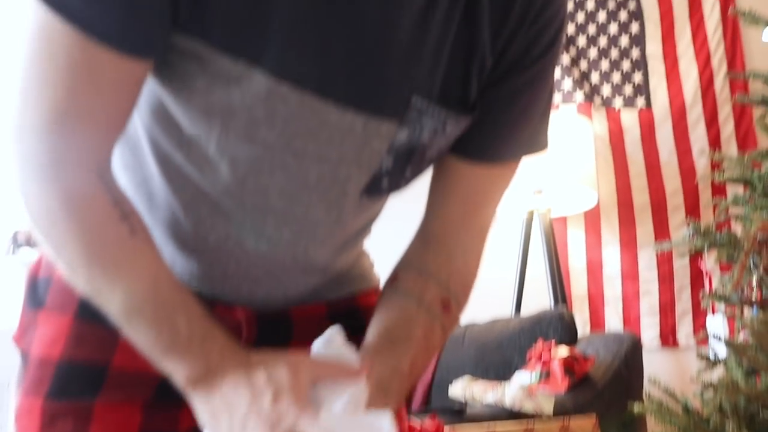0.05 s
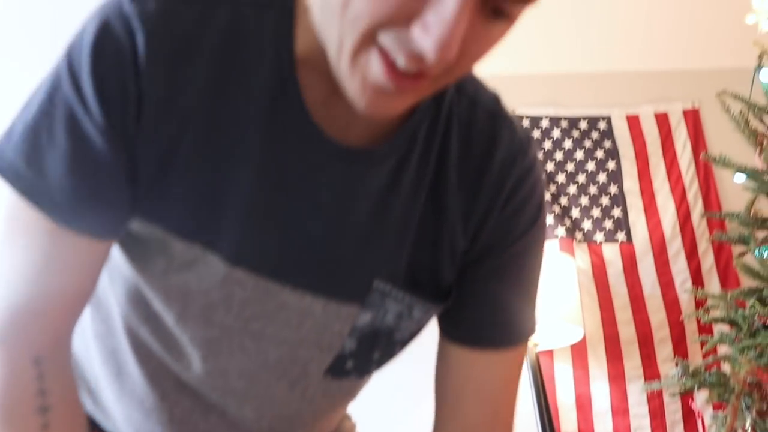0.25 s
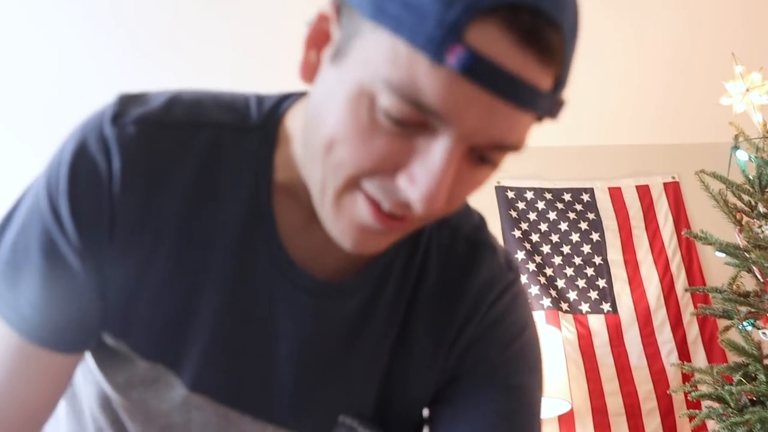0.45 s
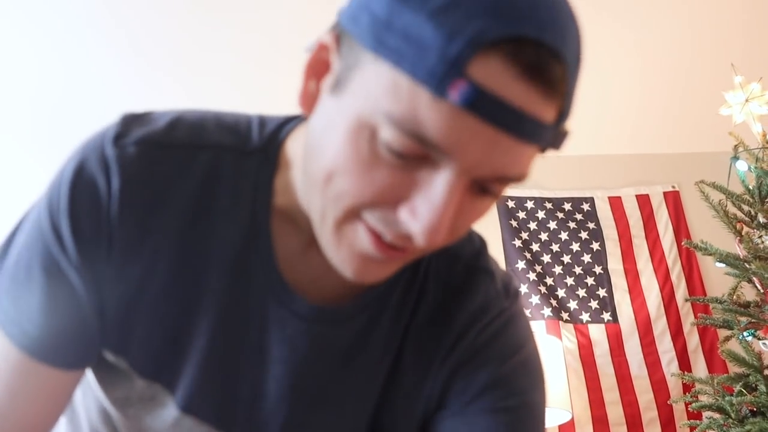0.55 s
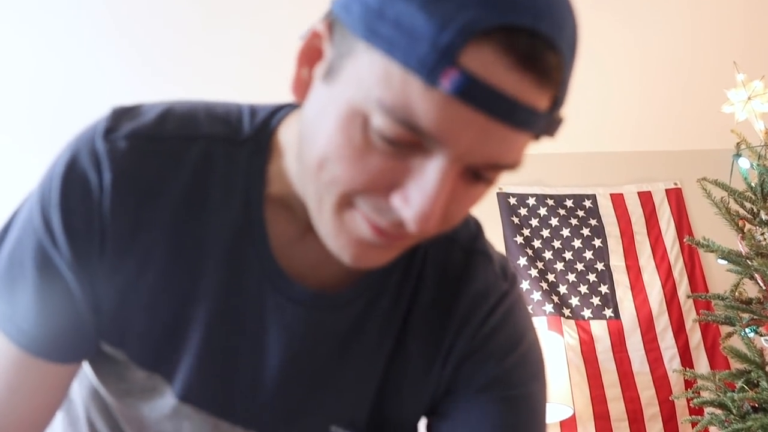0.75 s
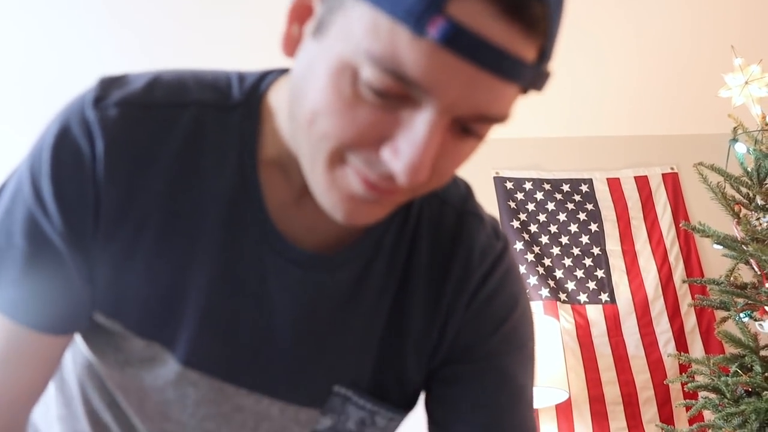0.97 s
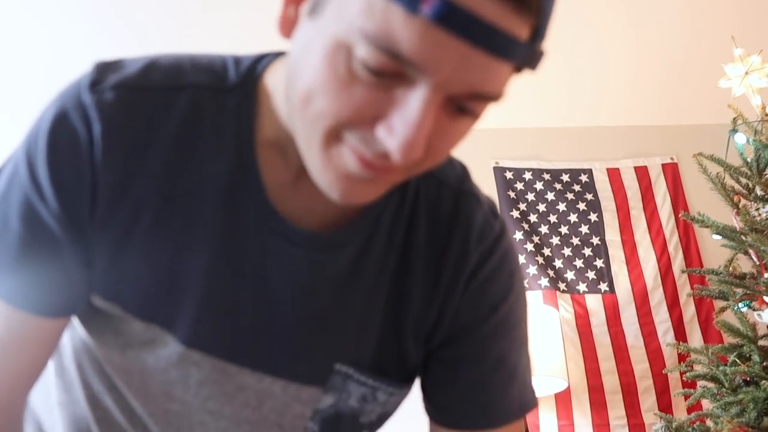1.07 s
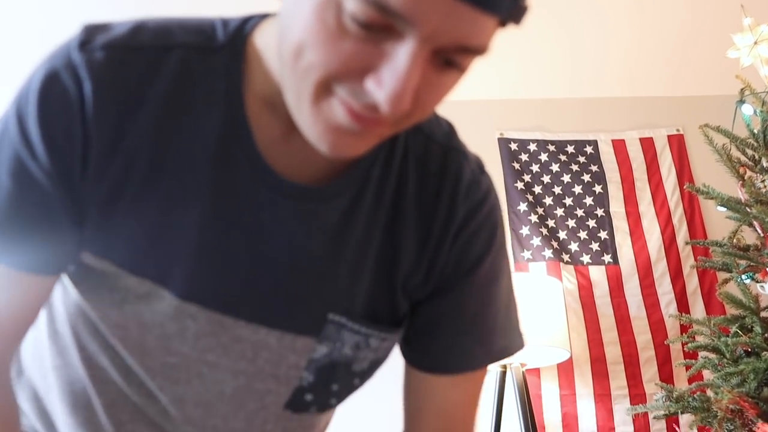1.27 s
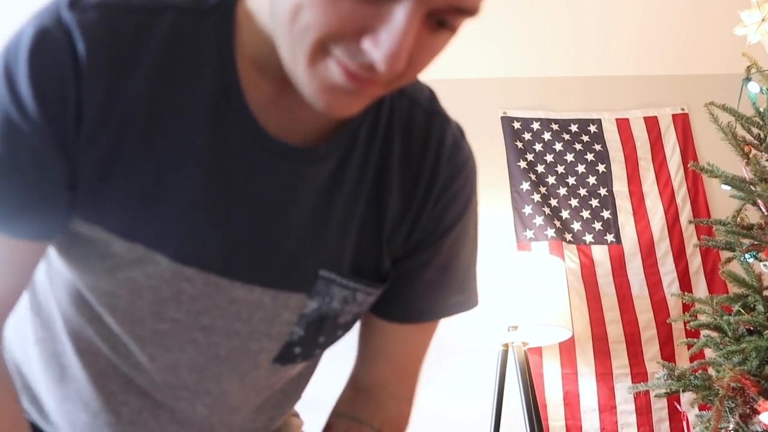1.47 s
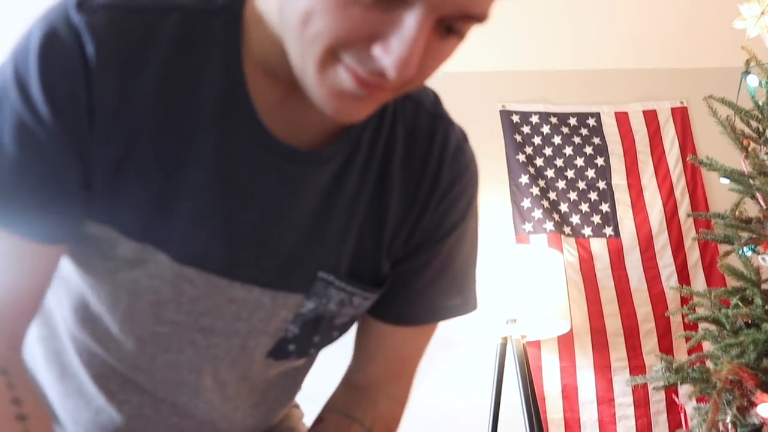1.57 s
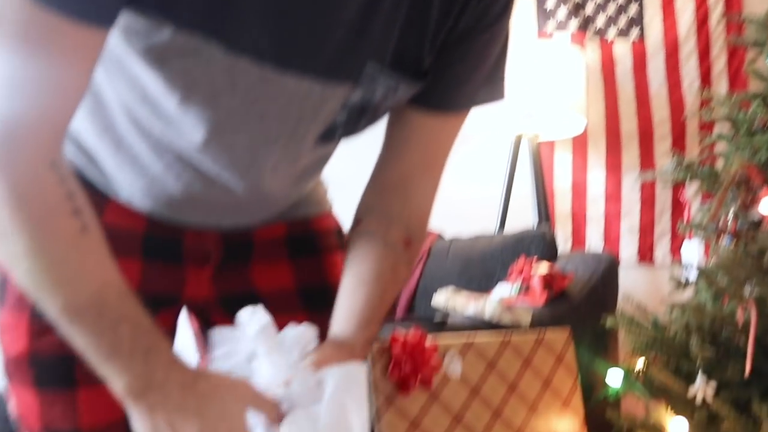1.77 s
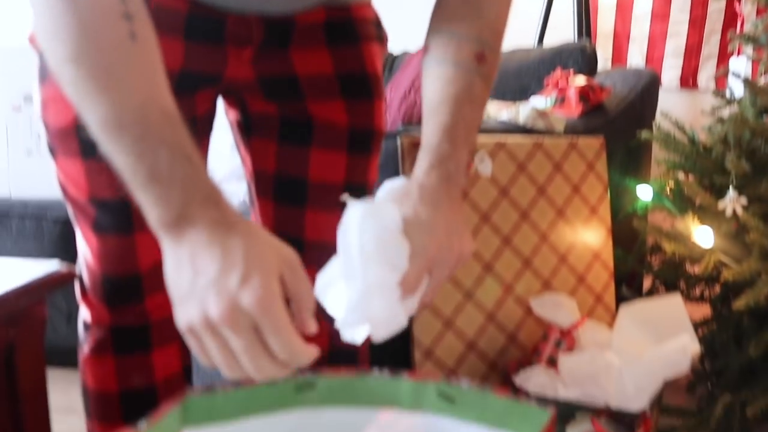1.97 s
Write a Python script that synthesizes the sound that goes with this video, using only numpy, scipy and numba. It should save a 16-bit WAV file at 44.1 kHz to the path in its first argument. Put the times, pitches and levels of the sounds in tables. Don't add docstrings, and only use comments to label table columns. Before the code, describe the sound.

Tissue paper crinkles densely and brightly as hands pull it from a gift bag indoors

```python
import sys
import numpy as np
from scipy import signal
from scipy.fft import rfft, irfft
from scipy.io import wavfile
from scipy.ndimage import map_coordinates
from numba import njit

SR = 44100
rng = np.random.default_rng(int(sys.argv[2]) if len(sys.argv) > 2 else 0)


def bounce(signal):
    frames = np.transpose(np.atleast_2d(signal))
    limited = np.clip(frames, -1, 1)
    pcm = np.round(limited * 32767).astype(np.int16)
    wavfile.write(sys.argv[1], SR, pcm)


def linear_from_db(decibels):
    return 10 ** (np.asarray(decibels, float) / 20)


N = 89126

# (time [s], effort [dB], open paper against paper in the bag [dB],
# rubbing on the bag walls [dB])
HANDS = [(0.0, -23.5, 4, -10), (0.1, -29.5, 1, -6.5), (0.12, -20, 2, -6.5), (0.24, -25.5, -5, -9),
         (0.34, -24.5, -12.5, -14), (0.54, -49, -20, -6), (0.65, -23.5, -13.5, -9.5),
         (0.71, -32.5, -12, -6.5), (1.18, -23, -19, -8.5), (1.19, -16.5, -24, -14.5),
         (1.25, -11, -20, -11.5), (1.29, -17, -12.5, -9), (1.52, -18, -17, -10), (1.59, -21, -8, -8),
         (1.66, -14, -9, -6), (1.69, -19.5, -10.5, -8), (1.95, -23.5, 1.5, -8), (2.02, -33, -13, -7)]
# (time [s], length [s], extra level [dB])
SQUEEZES = [(.02, 0.041, 1.5), (0.229, 0.014, 2.5), (0.31, 0.043, 2), (0.352, 0.029, 2.5),
            (0.392, 0.012, 6), (0.626, 0.024, -2.5), (0.835, 0.016, 2), (0.858, 0.013, 1.5),
            (0.946, 0.023, 3.5), (0.979, 0.021, 4.5), (1.113, 0.022, 3.5), (1.191, 0.018, 3.5),
            (1.377, 0.017, 2.5), (1.433, 0.016, 1.5), (1.54, 0.043, 3), (1.769, 0.047, 3.5),
            (1.832, 0.019, -0.5), (1.891, 0.021, 4), (1.936, 0.014, -1), (0.127, 0.027, 1),
            (0.167, 0.023, -4), (0.47, .04, -2.5), (.575, .025, -4), (0.618, 0.022, 4.5),
            (1.215, 0.013, 1.5), (1.275, .015, 1.5), (1.162, 0.013, -4.5), (1.06, 0.027, -1.5),
            (1.468, 0.023, -1), (1.645, 0.06, 1.5)]
# (frequency [Hz], density [dB])
BAG_PAPER = [(70, -18), (130, -11), (600, -12.5), (2000, -8.5), (2900, -9), (3850, -0.5), (5200, -3.5),
             (16000, -32)]
# (frequency [Hz], density [dB])
OPEN_PAPER = [(90, -26.5), (250, -16), (900, -9), (3700, -1), (7000, -3.5), (10200, -6.5), (13500, -11.5),
              (16000, -22)]
# (time [s], level [dB])
WOBBLE = [
    (0.0, -34),
    (0.04, -32),
    (0.1, -59),
    (0.3, -47),
    (0.78, -42),
    (0.8, -36.5),
    (1.64, -45.5),
    (1.97, -27),
    (2.02, -28.5),
]
# (frequency [Hz], density [dB])
ROOM_AIR = [(70, 9), (120, 2.5), (400, 0), (700, 1), (2500, -12), (3900, -22), (8000, -15), (16000, -34)]
# (time [s], peak level [dB], pitch [Hz])
SNAPS = [(0.0494, -10, 3800), (0.1357, -3, 3820), (0.2914, -5, 3900), (0.3446, -8, 3960),
         (0.4016, -15, 4800), (0.4323, -21, 3600), (0.5256, -25, 4120), (0.5735, -27, 4030),
         (0.6483, -18, 4440), (0.7184, -12, 4250), (0.739, -19, 3630), (0.7583, -8, 3910),
         (0.788, -16.5, 4000), (0.7974, -26, 4000), (0.8245, -12, 4290), (0.8304, -8.5, 4150),
         (0.9044, -12, 4050), (0.9214, -18, 3960), (0.9346, -5, 4350), (0.942, -17, 3980),
         (0.9602, -10, 3920), (1.0805, -10, 4900), (1.1064, -6, 3850), (1.1342, -11, 3980),
         (1.252, 4, 3860), (1.6578, -4, 3770), (1.8996, -8, 3530)]
# (time [s], peak level [dB], pitch [Hz])
TICKS = [(.1755, -16, 14000), (.1845, -15, 10500), (.3944, -24, 9000), (.534, -40, 11500),
         (.7397, -29, 8000), (.8734, -15, 8800), (.9625, -22, 11500), (.9834, -22, 12000),
         (1.2874, -16, 9500), (1.3295, -12, 11000), (1.3774, -14, 10000), (1.5664, -18, 14000),
         (1.5974, -15, 11500), (1.9217, -12, 13000), (1.9595, -7, 12000), (1.9735, -14, 13000),
         (2.0024, -20, 9200)]
# (time [s], peak level [dB], pitch
# [Hz])
BUMPS = [(0.79, -44, 124.2), (1.4, -24, 430), (1.4, -36, 130), (1.63, -32, 154), (1.645, -22, 529.2),
         (1.64, -22, 1296), (1.2, -22, 1750), (1.945, -24.5, 360), (1.76, -31, 30), (1.84, -30, 36),
         (1.925, -24.5, 39.2)]

CREASES_PER_S, CREASE_CYCLES = 7000, 3.48
CREASE_SPREAD_DB, CREASE_TOP_DB = 2.5, 8.5
CREASE_LOW_HZ, CREASE_OCTAVES = 320, 5.32
FLURRY_DB, FLURRY_PER_S, HISS_DB = 0.86, 110, -3
FLAP_DB, FLAP_PER_S = 2, 60
SHEET_DB, OPEN_DB = -0.5, 3.5
BAG_SHADE = 0.64
WALL_HZ, WALL_DB = 2230, 9
WOBBLE_HZ, WOBBLE_WIDTH_HZ = 35.8, 14.6
AIR_DB = -55
SNAP_CYCLES, SNAP_DB = 11.3, -5.5
TICK_CYCLES, TICK_DB = 19, -5
BUMP_CYCLES, BUMP_DB = 9.4, -2.5
ROOM_T60_S, ROOM_DB, ROOM_DULL_HZ = 0.42, -13, 5070
EARLY_S, EARLY_DB = 0.0022, -18.5
CEILING, TOP_HZ = 0.77, 15800


def level(x, db):
    return x * linear_from_db(db) / np.sqrt(np.mean(x ** 2))


def curve(table, axis):
    table = np.array(table, float)
    return np.interp(np.arange(N) / SR, table[:, 0], table[:, axis])


def colour(x, points):
    points, size = np.array(points, float), 4096
    hz = np.maximum(np.arange(size // 2 + 1) * SR / size, 1)
    db = np.interp(np.log(hz), np.log(points[:, 0]), points[:, 1])
    cepstrum = irfft(db * np.log(10) / 20)
    cepstrum[1:size // 2] *= 2
    cepstrum[size // 2 + 1:] = 0
    impulse = irfft(np.exp(rfft(cepstrum)))[:size // 2]
    return signal.fftconvolve(x, impulse)[:N]


def whiten(x):
    hz, power = signal.welch(x, SR, nperseg=256)
    return colour(x, np.c_[hz[1:], -10 * np.log10(power[1:])])


def band(x, hz, width_hz):
    return signal.lfilter(*signal.iirpeak(hz, hz / width_hz, fs=SR), x)


def walk(rate):
    steps = rng.standard_normal(2000)
    path = map_coordinates(steps, [np.arange(N) / SR * rate], order=1)
    return path / path.std()


@njit
def grains(n, start, turn, cycles, size):
    out = np.zeros(n)
    for k in range(len(start)):
        fade = 7 * turn[k] / (2 * np.pi * cycles[k])
        spin = np.exp(1j * turn[k] - fade)
        z = size[k] * fade * np.e + 0j
        first = int(start[k])
        for i in range(first, min(n, first + int(10 / fade) + 2)):
            z *= spin
            out[i] += (i - first + 1) * z.imag
    return out


def crease_clicks():
    chance = rng.random((30000, 3))
    start = np.cumsum(-np.log(1 - chance[:, 0])) / CREASES_PER_S * SR
    start, chance = start[start < N], chance[start < N]
    hz = CREASE_LOW_HZ * 2 ** (CREASE_OCTAVES * np.sqrt(chance[:, 1]))
    hz = np.minimum(hz, 0.4 * SR)
    db = np.minimum(-CREASE_SPREAD_DB * np.log(1 - chance[:, 2]), CREASE_TOP_DB)
    sign = np.where(np.arange(len(hz)) % 2, 1, -1)
    clicks = grains(N, start, 2 * np.pi * hz / SR, CREASE_CYCLES + 0 * hz, linear_from_db(db) * sign)
    return whiten(clicks)


def hand_effort():
    t = np.arange(N) / SR
    db = curve(HANDS, axis=1) + SHEET_DB
    for at, length, extra_db in SQUEEZES:
        db = db + extra_db * np.exp(-((t - at) / length) ** 2 * 2)
    return linear_from_db(db)


def crumpled_paper():
    clicks = level(crease_clicks(), 0)
    hiss = level(rng.standard_normal(N), HISS_DB)
    sheet = (clicks + hiss) * linear_from_db(FLURRY_DB * walk(FLURRY_PER_S))
    open_gain = linear_from_db(curve(HANDS, axis=2) + OPEN_DB)
    bag_gain = np.clip(1 - BAG_SHADE * open_gain, 0, 1)
    in_bag = level(colour(sheet, BAG_PAPER), 0)
    in_open = level(colour(sheet, OPEN_PAPER) * linear_from_db(FLAP_DB * walk(FLAP_PER_S)), 0)
    paper = bag_gain * in_bag + open_gain * in_open
    walls = signal.sosfiltfilt(signal.butter(2, WALL_HZ, fs=SR, output="sos"), paper)
    wall_gain = linear_from_db(curve(HANDS, axis=3) + WALL_DB) - 1
    return hand_effort() * (paper + wall_gain * walls)


def wobble():
    sway = rng.standard_normal(N)
    for width_hz in (WOBBLE_WIDTH_HZ, WOBBLE_WIDTH_HZ, 2 * WOBBLE_WIDTH_HZ):
        sway = band(sway, WOBBLE_HZ, width_hz)
    return level(sway, 0) * linear_from_db(curve(WOBBLE, axis=1))


def room_air():
    return level(colour(rng.standard_normal(N), ROOM_AIR), AIR_DB)


def rings(table, cycles, trim_db):
    at, db, hz = np.array(table, float).T
    return grains(N, at * SR, 2 * np.pi * hz / SR, cycles + 0 * hz, linear_from_db(db + trim_db))


def snaps():
    return rings(SNAPS, SNAP_CYCLES, SNAP_DB)


def ticks():
    return rings(TICKS, TICK_CYCLES, TICK_DB)


def bumps():
    return rings(BUMPS, BUMP_CYCLES, BUMP_DB)


def room(x):
    t = np.arange(SR // 2) / SR
    early = rng.standard_normal(len(t)) * np.exp(-t / EARLY_S)
    tail = rng.standard_normal(len(t)) * linear_from_db(-60 * t / ROOM_T60_S)
    tail = tail * np.minimum(t / 0.011, 1)
    tail = signal.sosfilt(signal.butter(1, ROOM_DULL_HZ, fs=SR, output="sos"), tail)
    echo = linear_from_db(EARLY_DB) * early / np.linalg.norm(early) + linear_from_db(ROOM_DB) * tail / np.linalg.norm(tail)
    echo = signal.sosfilt(signal.butter(1, 500, "high", fs=SR, output="sos"), echo)
    return x + signal.fftconvolve(x, echo)[:N]


def scene():
    air = room_air()
    handling = crumpled_paper() + (snaps() + ticks() + bumps())
    return (room(handling) + air + wobble())[None]


def roll_off(x):
    return signal.sosfilt(signal.butter(12, 16500, fs=SR, output="sos"), x)


def record(dry):
    heard = CEILING * np.tanh(dry / CEILING)
    heard = signal.sosfilt(signal.ellip(10, 0.2, 62, TOP_HZ, fs=SR, output="sos"), heard)
    return roll_off(heard)


dry = scene()
out = record(dry)
bounce(out)
```